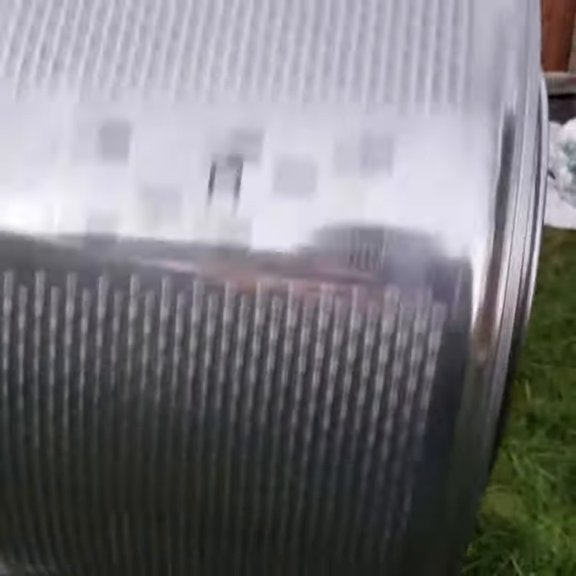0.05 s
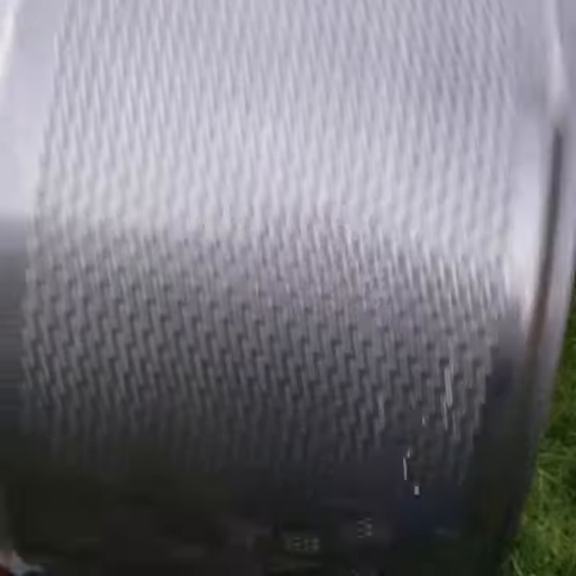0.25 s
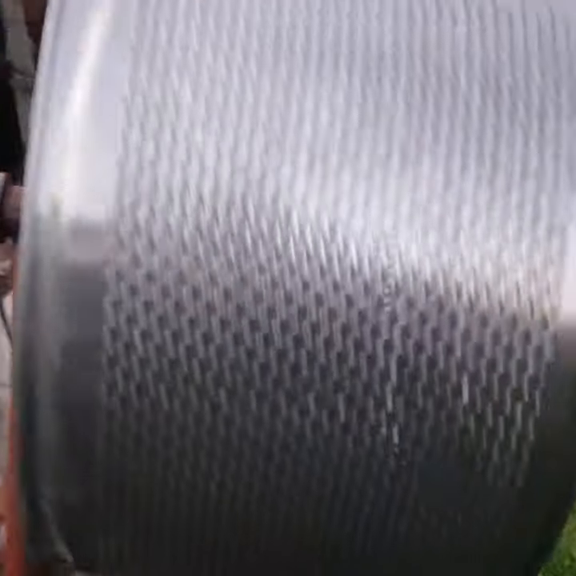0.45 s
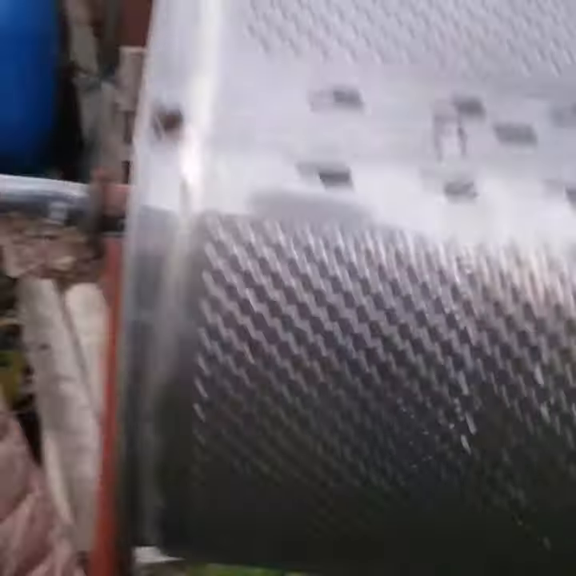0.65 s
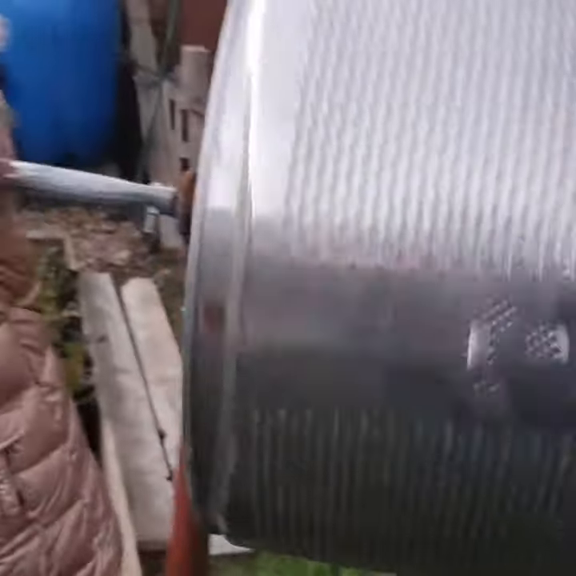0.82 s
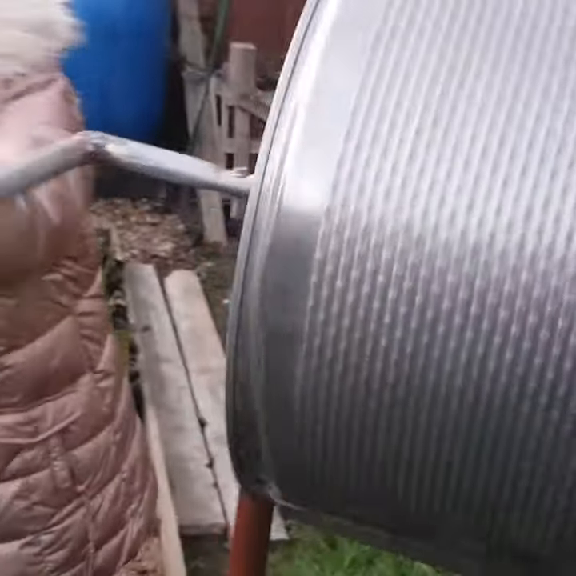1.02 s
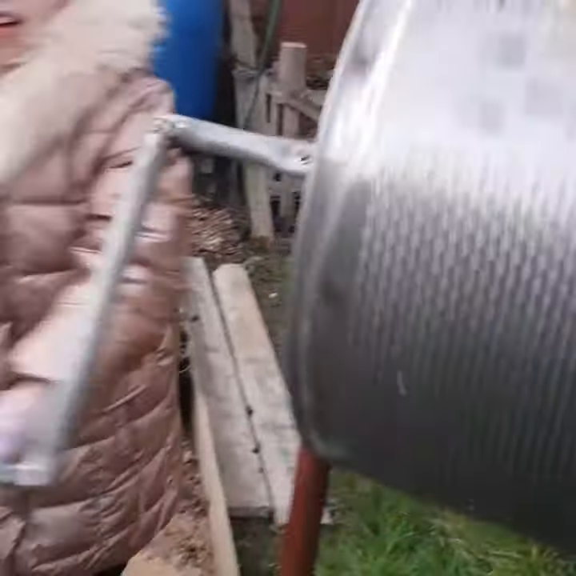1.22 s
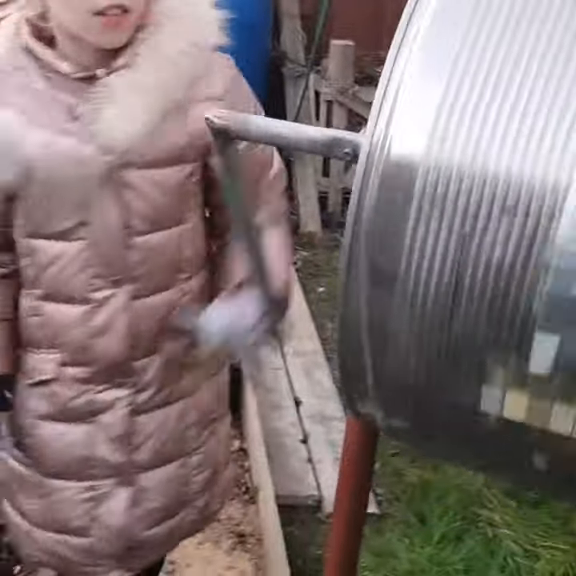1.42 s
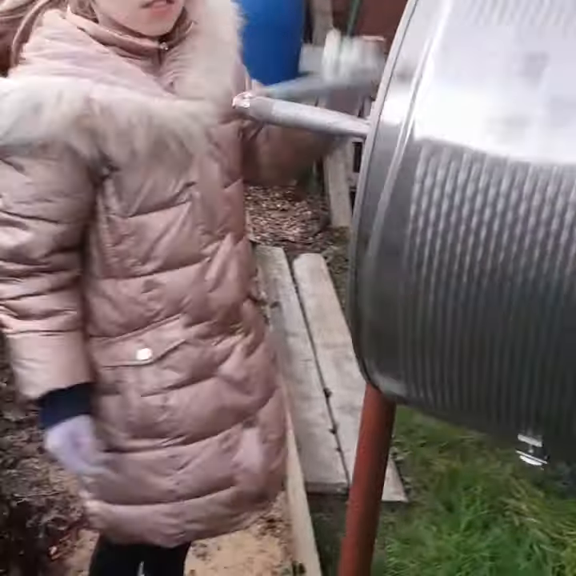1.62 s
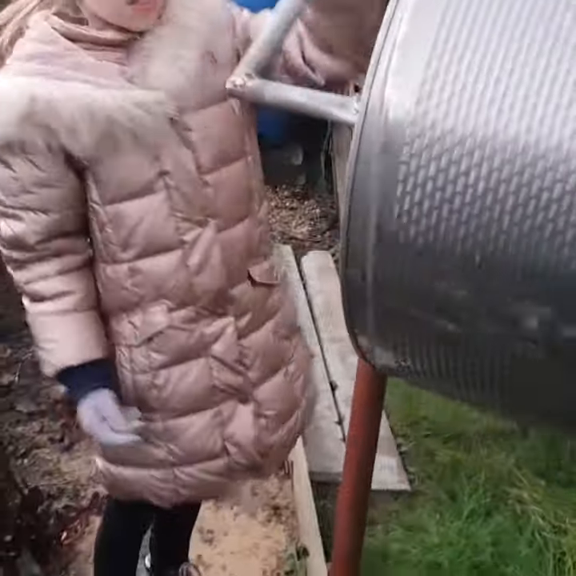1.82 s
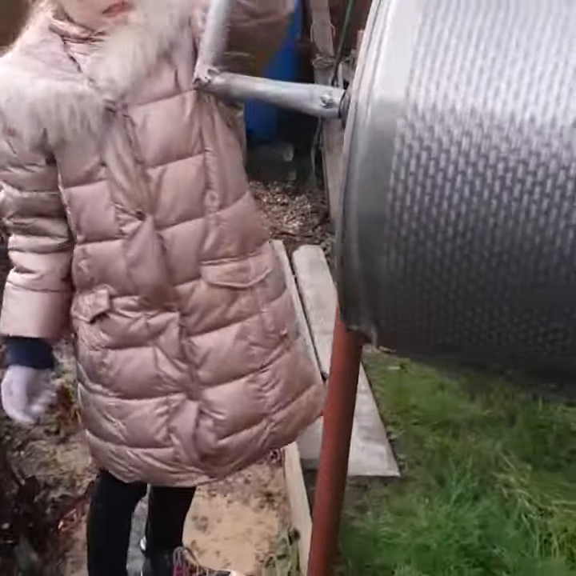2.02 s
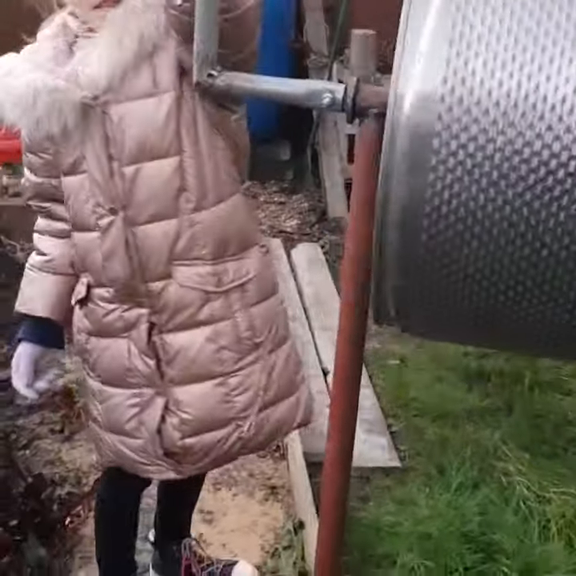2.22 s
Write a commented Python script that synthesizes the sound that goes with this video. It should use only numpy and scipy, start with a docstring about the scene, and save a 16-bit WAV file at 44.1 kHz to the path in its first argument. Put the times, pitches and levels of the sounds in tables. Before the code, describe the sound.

A steel drum's dry axle squeals twice, high and ringing, as it is cranked by hand in a garden. Between the squeals, stones tap the wall, metal clinks and soil slides, while light wind rumbles on the nearby microphone.

```python
"""Hand-cranked steel drum in a garden

A perforated drum goes round about once in 1.6 s. Its dry axle sticks and slips into a squeal on
each turn, a lower mode of the crank groans along, and the drum rings with both. Stones drop against
the wall, loose metal clinks, the bearings rub and soil slides, while wind buffets the microphone."""
import sys
import numpy as np
from scipy import signal
from scipy.fft import rfft, irfft
from scipy.io import wavfile
from scipy.ndimage import uniform_filter1d

SR = 44100
rng = np.random.default_rng(int(sys.argv[2]) if len(sys.argv) > 2 else 0)


def store_pcm(level_fs):
    """Save levels as 16-bit WAV."""
    pcm = np.round(np.clip(level_fs, -1, 1) * 32767).astype(np.int16)
    wavfile.write(sys.argv[1], SR, np.atleast_2d(pcm).T)


N = 103635
T = np.arange(N) / SR

# The squeal's gesture on each turn: t/s, f/Hz, level/dB before the trim, overtone lift/dB
FIRST_TURN = [(.16,3835,-60,-10),(.197,3835,-35,-14),(.213,3824,-16,-3),(.228,3820,-21,3),(.252,3824,-10,-2),(.275,3828,-17,5),(.30,3832,-16,8),(.335,3803,-8,-5),(.355,3785,-19,3),(.387,3802,-7,-9),(.415,3812,-20,0),(.45,3808,-19,-6),(.49,3805,-34,-8),(.6,3805,-52,-14),(.73,3805,-62,-20)]
SECOND_TURN = [(1.735,3850,-62,-21),(1.765,3797,-47,-22),(1.835,3804,-41.5,-15.5),(1.86,3796,-26.5,-3.5),(1.89,3823,-16,-6.5),(1.911,3840,-34.5,4),(1.928,3788,-16,-4),(1.97,3778,-23,-6),(2.01,3804,-28.5,-2.5),(2.035,3793,-25.5,-16.5),(2.07,3789,-19,-4),(2.14,3757,-35.5,-8),(2.2,3780,-41.5,-15),(2.27,3770,-56.5,-18)]
# Harmonics 2 to 4: level/dB re the fundamental before the lift, pan/dB
SQUEAL_OVERTONES = [(-13,13),(-18,7.5),(-19,6)]
SQUEAL_TRIM_DB, SQUEAL_HISS_DB, SQUEAL_JITTER, SQUEAL_WET = -0.5, -40, 0.0034, 3.2

def axle_squeal(gesture, pull):
    """A stick-slip tone with friction hiss; the crank's pull bends its phase and adds sidebands."""
    times, hz, db, lift_db = np.array(gesture).T
    sounding = (T > times[0]) & (T < times[-1])
    envelope = slew(slew(undb(np.interp(T, times, db)) * sounding))
    pitch = np.interp(T, times, hz) * (1 + SQUEAL_JITTER * walk(250))
    phase = 2 * np.pi * np.cumsum(pitch) / SR + .3 * pull
    lift = slew(np.interp(T, times, lift_db))
    out = drum_ring(envelope, np.sin(phase), SQUEAL_WET) * pan(3)
    for k, (overtone_db, pan_db) in enumerate(SQUEAL_OVERTONES, 2):
        overtone_envelope = envelope * undb(overtone_db + lift)
        out += drum_ring(overtone_envelope, np.sin(k * phase), SQUEAL_WET) * pan(pan_db)
    hiss = undb(SQUEAL_HISS_DB) * envelope * wall(noise(), tilt_db=3.5)
    return undb(SQUEAL_TRIM_DB) * (out + hiss)


# The crank catches: t/s, grip length/s, f/Hz, relative level/dB, pitch roughness,
# bite (scales the overtones and the pull on the squeal)
GROANS = [(.306,.022,1915,-35,.018,.2),(.366,.016,1915,-37,.05,.25),(.835,.08,1820,-42,.001,0),(1.935,.06,2053,-32,.012,.45)]
# Harmonics 2 to 4: level/dB before bite and grip scale them
GROAN_OVERTONES = [-3.5,-7,-18.5]
GROAN_ATTACK_S, GRIP_RELEASE_S, GROAN_T60_S, GROAN_FLUTTER_DB = 0.026, 0.02, 0.64, 1.5

def crank_groan():
    """The lower mode swells while friction grips it, then rings out; also returns its pull."""
    out, pull = 0, 0
    for start, length, hz, db, roughness, bite in GROANS:
        rise = np.sin(np.pi / 2 * np.clip((T - start) / GROAN_ATTACK_S, 0, 1)) ** 2
        since_release = np.maximum(T - start - length, 0)
        grip = rise * np.exp(-since_release / GRIP_RELEASE_S)
        tail = rise * np.exp(-np.log(1000) * since_release / GROAN_T60_S)
        pitch = hz * (1 + roughness * grip * walk(400))
        phase = 2 * np.pi * np.cumsum(pitch) / SR
        overtones = sum(undb(level) * np.sin(k * phase) for k, level in enumerate(GROAN_OVERTONES, 2))
        tone = np.sin(phase) + bite * grip * overtones
        envelope = undb(db + GROAN_FLUTTER_DB * walk(45)) * (0.41 * grip + 0.57 * tail)
        out += drum_ring(envelope, tone, wet=1.6)
        pull += bite * grip * np.sin(phase)
    return out, pull


def drum_ring(envelope, tone, wet):
    """The drum's dense ringing smears a tone across the channels; its slow level follows the envelope."""
    direct = envelope * tone
    ringing = signal.fftconvolve(direct[None], noise() * fade(t60=.3), axes=1)[:, :N]
    blend = unit(unit(direct) + wet * unit(ringing))
    window = np.hanning(1500)
    slow_power = signal.fftconvolve(np.mean(blend ** 2, axis=0), window, mode="same") / window.sum()
    return envelope * blend / np.sqrt(np.abs(slow_power) + 1e-9)


# The steel body's resonance clusters: f/Hz, relative level/dB
WALL_RESONANCES = [(280,-3),(950,-7),(1330,-7.5),(1800,-12),(2650,-3),(3150,-2.5),(3650,0.5),(4120,4.5),(4470,0.5),(5280,0),(5970,-3),(6400,0),(7020,2),(7350,-3),(7980,1),(8620,-3.5),(9360,-2),(10300,0),(11200,-0.5),(12000,-2.5),(12950,-3.5),(14050,-6),(15100,-10.5)]

def wall(x, tilt_db=0):
    """Pass a sound through the wall's resonances, which widen with frequency; tilt is per octave."""
    f = np.fft.rfftfreq(N, 1 / SR)
    power = 0
    for hz, db in WALL_RESONANCES:
        detuning = 2 * (f - hz) / (200 + 0.039 * hz)
        peak = undb(db + tilt_db * np.log2(hz))
        power += (peak / (1 + detuning ** 2) ** 1.5) ** 2
    return unit(irfft(rfft(x) * np.sqrt(power), N))


# Stone hits on the wall: t/s, level/dB
STONE_HITS = [(0.037,-37.5),(0.047,-37),(.06,-34.5),(.089,-37),(0.729,-40),(0.746,-35.5),(1.613,-39.5),(1.626,-41.5),(1.638,-38.5),(2.269,-36.5),(2.284,-31)]
# Wall modes that sing out after a hit: f/Hz, level/dB re the hit, t60/s
CLEAR_MODES = [(994,-21,0.17),(2729,-9,0.11),(5880,-10,.25),(7060,-22.5,0.48),(7540,-18,0.35)]
WASH_T60_S, CRACK_T60_S, CRACK_DB, GRIT_PER_S = 0.21, .015, -2, 3500

def stones():
    """Each landing is a crack, a gritty wash of tiny secondary contacts and a few clear wall modes."""
    power = 0
    for start, db in STONE_HITS:
        crack = undb(CRACK_DB) * fade(CRACK_T60_S, start)
        power += (undb(db) * (crack + fade(WASH_T60_S, start))) ** 2
    grit = np.sqrt(power) * wall(grains(GRIT_PER_S))
    ringing = sum(undb(db) * ring(CLEAR_MODES, start) for start, db in STONE_HITS)
    return (grit + ringing) * pan(1.5)


# Taps of loose metal: t/s, click level/dB, relative ring level/dB
CLINKS = [(.541,-49.5,-50.5),(0.604,-50,-55),(.658,-53.5,-63),(0.681,-54,-70),(.888,-57,-97),(1.394,-47.5,-51),(1.41,-41,-42.5),(1.45,-46,-64),(1.504,-45,-56),(1.594,-50,-50),(2.107,-45.5,-43.5),(2.181,-50,-40.5),(2.206,-44.5,-42.5),(2.238,-42,-49)]
# The part's bright ring: f/Hz, relative level/dB, t60/s
CLINK_MODES = [(6850,-4,.33),(7004,-2,.35),(7370,-6,.2)]
CLICK_T60_S, CLINK_RING_GAIN = 0.15, 1.73

def clinks():
    """Light taps on the wall set a small steel part ringing."""
    power = sum((undb(db) * fade(CLICK_T60_S, start)) ** 2 for start, db, _ in CLINKS)
    ringing = sum(undb(db) * ring(CLINK_MODES, start) for start, _, db in CLINKS)
    clicks = np.sqrt(power) * wall(noise(), tilt_db=3.5)
    return (clicks + CLINK_RING_GAIN * ringing) * pan(2)


# Dry scuffs of the crank in its bearings: t/s, decay/s, centre f/Hz, width/Hz, level/dB
RUBS = [(0,.04,2550,200,-58),(0.538,0.067,2670,205,-49),(.88,.2,3050,350,-58.5),(1.39,.09,2625,247,-47.5),(1.475,.1,1280,220,-52)]
RUB_ATTACK_S = 0.0058

def bearing_rubs():
    """Friction too weak to sing: noise in one resonance starts quickly and dies away."""
    out = 0
    for start, decay, hz, width, db in RUBS:
        resonance = signal.butter(2, [hz - width / 2, hz + width / 2], "band", fs=SR, output="sos")
        scuff = unit(signal.sosfilt(resonance, noise()))
        attack = np.clip((T - start) / RUB_ATTACK_S, 0, 1)
        out += undb(db) * scuff * attack * np.exp(-((T - start) / decay) ** 2)
    return out


# Swells of sliding soil: t/s, level/dB
SOIL_SWELLS = [(0,-47),(.2,-56.5),(.5,-64.5),(.7,-53),(.85,-49.5),(.97,-54.5),(1.15,-65),(1.33,-69),(1.52,-54.5),(1.75,-56),(2.1,-62.5),(2.35,-47.5)]
# Its sandy tone: f/Hz, relative level/dB
SOIL_COLOUR = [(150,-15),(300,-10),(500,-18.5),(950,-9.5),(1600,-8.5),(2100,-10),(2800,-5.5),(4200,-12),(4900,-27.5),(7200,-21),(9000,-29.5),(16000,-23.5)]
SOIL_GRAINS_PER_S, SOIL_FLICKER_DB = 7500, 3

def soil():
    """Fine grains patter along the turning wall."""
    patter = colour(grains(SOIL_GRAINS_PER_S), SOIL_COLOUR)
    level_db = np.interp(T, *np.array(SOIL_SWELLS).T) + SOIL_FLICKER_DB * walk(30)
    return patter * undb(level_db)


# Gusts: t/s, level/dB
GUSTS = [(0,-56),(.04,-47.5),(.12,-66.5),(.29,-51),(.48,-62.5),(.7,-70.5),(.83,-47),(.92,-59),(1,-49.5),(1.25,-45.5),(1.36,-56.5),(1.47,-51.5),(1.64,-63),(1.9,-48.5),(2.05,-49),(2.2,-42),(2.35,-43.5)]
# Their low rumble: f/Hz, relative level/dB
WIND_COLOUR = [(20,-23),(35,-3.5),(50,3.5),(80,0),(130,-6.5),(200,-19),(400,-40),(1000,-59.5)]

def wind():
    """Gusts buffet the microphone, heavier on the left."""
    rumble = colour(noise(side=0.67), WIND_COLOUR)
    return rumble * undb(np.interp(T, *np.array(GUSTS).T)) * pan(9)


def bump(start=.274, hz=135, db=-35, t60=.12):
    """One soft bump on the microphone: a low, quickly damped sine."""
    return undb(db) * fade(t60, start) * np.sin(2 * np.pi * hz * (T - start))


# The dark bed of air: f/Hz, relative level/dB
AIR_COLOUR = [(60, 0.5), (150, -1), (300, -1), (500, -10), (850, -3.5), (1500, -13), (4000, -23),
              (16000, -37.5)]

def garden_air(db=-60.5):
    """Quiet, steady noise from all around."""
    return undb(db) * colour(diffuse_noise(), AIR_COLOUR)


def ring(modes, start):
    """Decaying, slightly wavering modes, reaching each channel in a different phase."""
    first = int(start * SR)
    span = slice(first, first + SR // 2)
    waver = .002 * np.cumsum(walk(300))[span] / SR
    t, out = T[span], np.zeros((2, N))
    for hz, db, t60 in modes:
        cycles = hz * (t + rng.choice([-1, 1]) * waver) + rng.random((2, 1))
        decay = np.exp(-np.log(1000) * (t - start) / t60)
        out[:, span] += np.sqrt(2) * undb(db) * decay * np.sin(2 * np.pi * cycles)
    return out


def grains(per_s):
    """Tiny impacts at random times."""
    return diffuse_noise() * (rng.random(N) < per_s / SR)


def diffuse_noise():
    """Noise from all around: alike in both channels in the bass, unrelated in the treble."""
    mid, side = rng.standard_normal((2, N))
    width = np.clip(np.fft.rfftfreq(N, 1 / SR) / 1100, .25, 1)
    side = irfft(rfft(side) * width, N)
    return np.array([mid + side, mid - side])


def noise(side=1):
    """Stereo noise; side 1 leaves the channels unrelated."""
    mid, spread = rng.standard_normal((2, N))
    return np.array([mid + side * spread, mid - side * spread])


def colour(x, points):
    """Shape a noise by (f/Hz, level/dB) points and scale it to rms 1."""
    octave = np.log2(np.maximum(np.fft.rfftfreq(N, 1 / SR), 1))
    hz, db = np.array(points).T
    gain = undb(np.interp(octave, np.log2(hz), db))
    return unit(irfft(rfft(x) * gain, N))


def walk(rate):
    """Smooth random wobble with rms 1, taking rate steps a second."""
    steps = np.interp(T * rate, np.arange(8000), rng.standard_normal(8000))
    return unit(uniform_filter1d(steps, int(SR / rate)))


def slew(curve, seconds=.005):
    """Round off a control curve's corners."""
    return uniform_filter1d(curve, int(seconds * SR))


def fade(t60, start=0):
    """Exponential decay from a start time."""
    return (T >= start) * np.exp(-np.log(1000) * np.maximum(T - start, 0) / t60)


def pan(db):
    """Channel gains for a left minus right level in dB."""
    return undb(np.array([[db], [-db]]) / 2)


def unit(x):
    """Scale each channel to rms 1."""
    return x / np.sqrt(np.mean(x ** 2, axis=-1, keepdims=True))


def undb(db):
    """Decibels to gain."""
    return 10 ** (np.asarray(db) / 20)


def scene():
    """Two squeals over the crank, the tumbling load and the garden."""
    groan, pull = crank_groan()
    squeals = axle_squeal(FIRST_TURN, pull) + axle_squeal(SECOND_TURN, pull)
    return squeals + groan + bearing_rubs() + stones() + clinks() + soil() + wind() + bump() + garden_air()


def record(dry):
    """A steep low-pass cuts the treble above 16 kHz."""
    return signal.sosfilt(signal.ellip(8, .2, 80, 16000, fs=SR, output="sos"), dry)


dry = scene()
out = record(dry)
store_pcm(out)
```